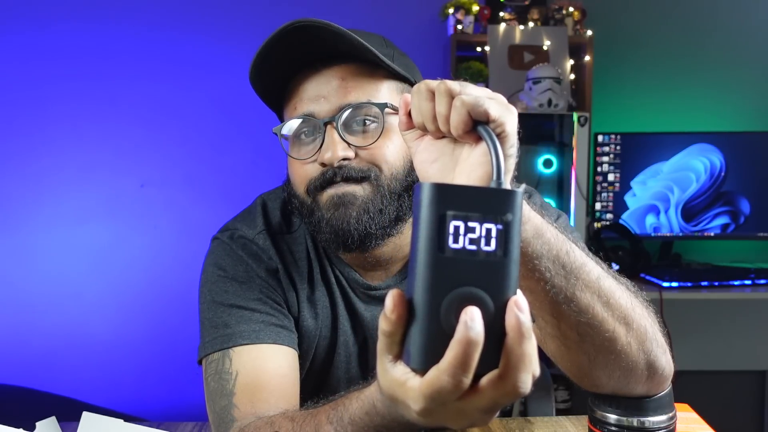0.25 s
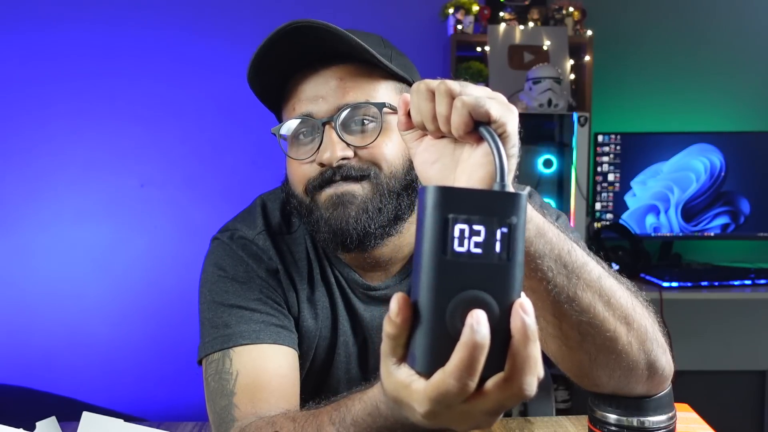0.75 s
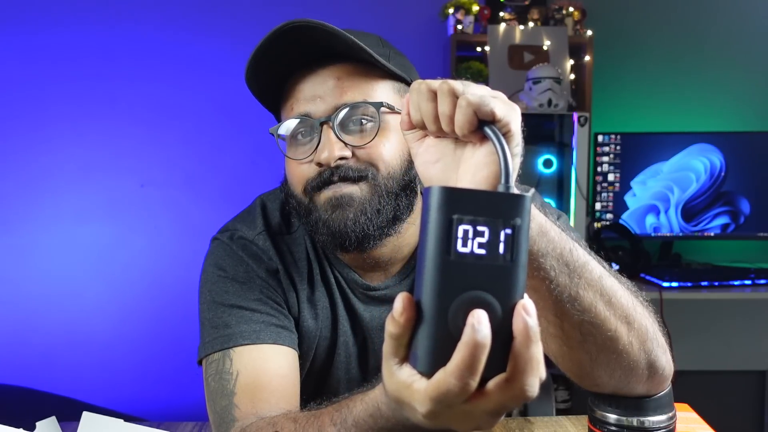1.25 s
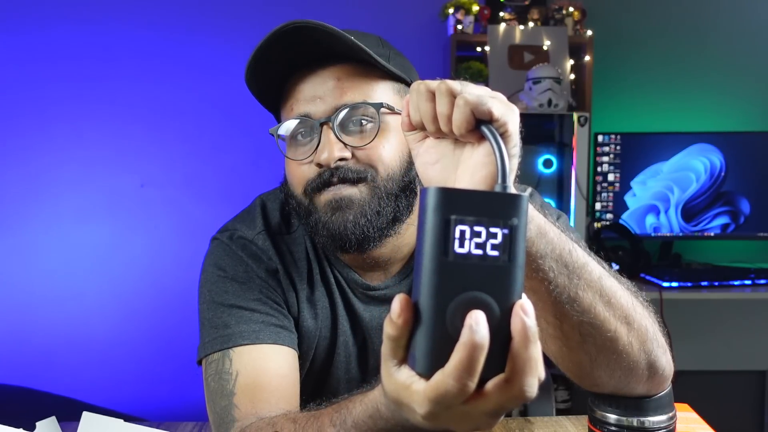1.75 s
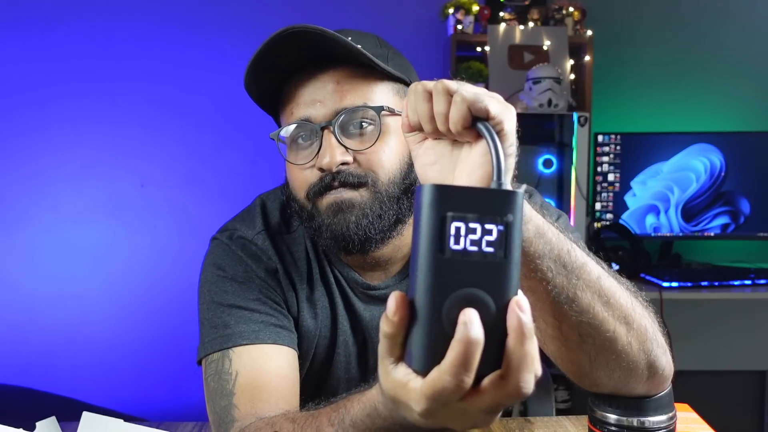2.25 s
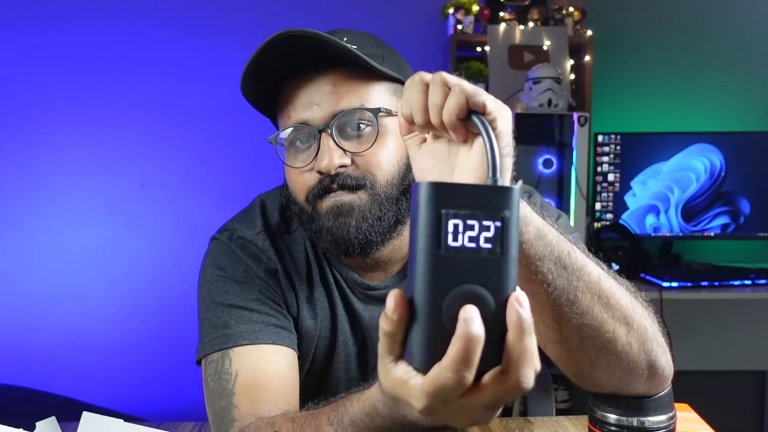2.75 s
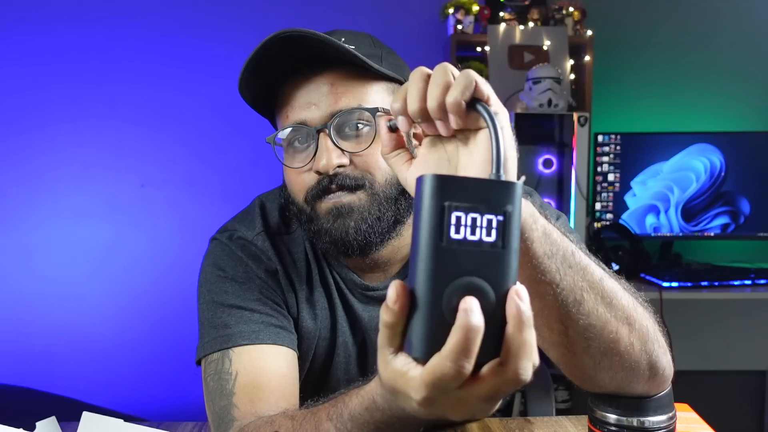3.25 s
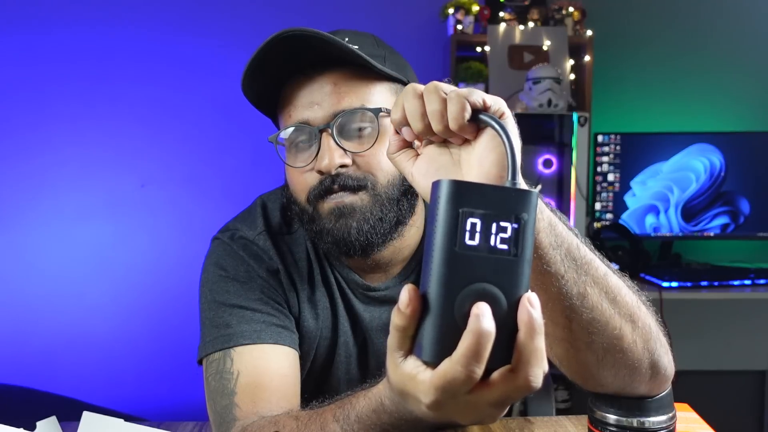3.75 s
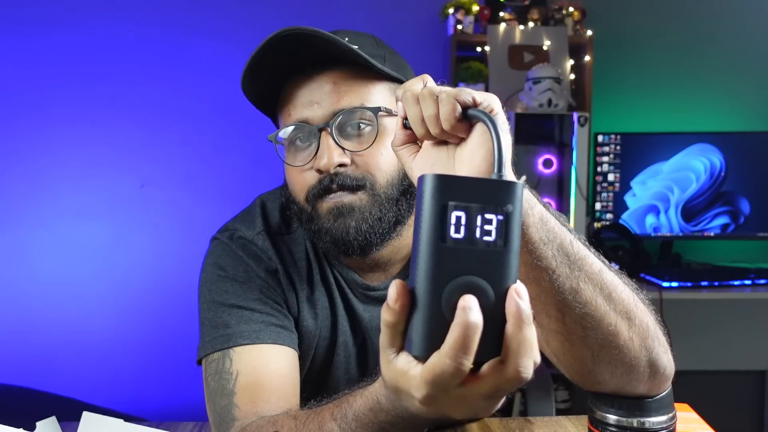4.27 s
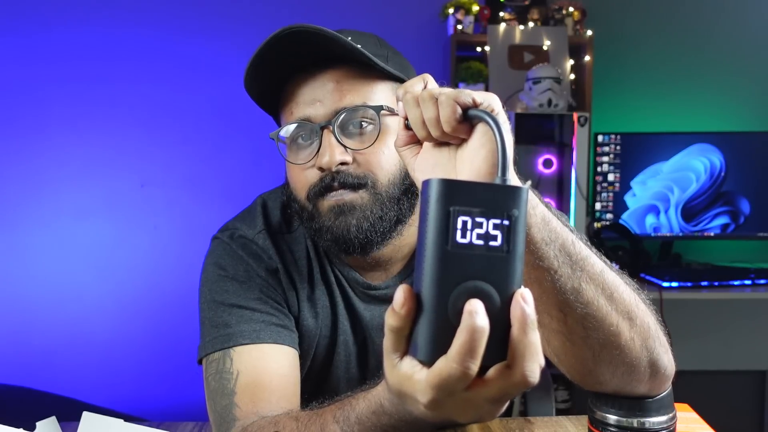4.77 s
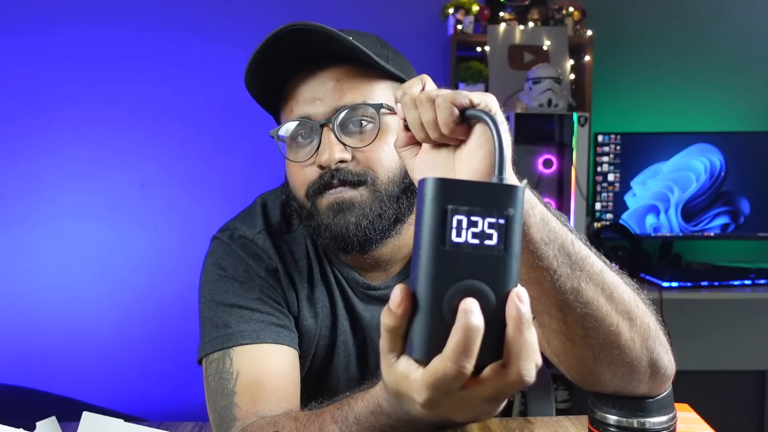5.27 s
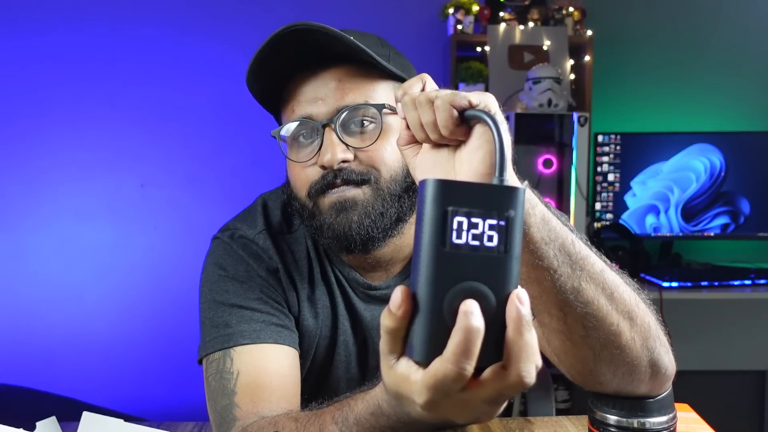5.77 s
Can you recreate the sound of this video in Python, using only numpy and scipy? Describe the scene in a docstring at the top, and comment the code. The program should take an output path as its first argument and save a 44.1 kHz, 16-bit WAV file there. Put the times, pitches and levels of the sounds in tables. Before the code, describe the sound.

A small hand-held air pump buzzes loudly and steadily with a whining gear tone, briefly racing and hissing midway, then labouring slightly lower.

```python
"""A hand-held electric piston pump runs in a small room, its hose end held shut by a hand.
Each crank turn knocks the case, rattles the drive and puffs air; the gears whine and sag under compression.
Knocks ring case resonances, ticks and air are shaped noise, and whine, hum and motor are sines locked to the crank.
The pump settles a little after a loud start. Near 3 s the grip opens and closes again:
air escapes and the motor races briefly, then labours against a tighter seal."""
import sys
import numpy as np
from scipy import signal
from scipy.fft import rfft, irfft, next_fast_len
from scipy.io import wavfile
from scipy.ndimage import map_coordinates

SR = 44100
rng = np.random.default_rng(int(sys.argv[2]) if len(sys.argv) > 2 else 0)


def transcribe(u):
    """Save the signal u as a 16-bit wav file named by the first command-line argument.

    u: samples, shape (n,) or (channels, n), limited to [-1, 1]; the rate is SR.
    q: integer samples, one column per channel.
    """
    v = np.clip(np.atleast_2d(u).T, -1, 1)
    q = np.round(v * 32767).astype(np.int16)
    wavfile.write(sys.argv[1], SR, q)


N = 265482  # length [samples]

GEAR_RATIO, TEETH = 7.4, 12  # motor turns per crank turn, teeth on the motor's pinion


def amp(db):
    """Decibels to gain."""
    return 10 ** (np.asarray(db) / 20)


def unit(x):
    """Scaled to rms 1."""
    return x / np.sqrt(np.mean(x ** 2) + 1e-20)


def curve(rows):
    """A (time, value) table as one value per sample."""
    times, values = np.transpose(rows)
    return np.interp(np.arange(N) / SR, times, values)


def wobble(rate):
    """A smooth random curve, rate knots a second."""
    knots = rng.standard_normal(int(N * rate / SR) + 4)
    return map_coordinates(knots, [np.arange(N) * rate / SR])


def filtered(x, response):
    """x times a complex response of frequency."""
    size = 2 * next_fast_len(N // 2 + SR // 4)
    spectrum = rfft(x, size) * response(np.fft.rfftfreq(size, 1 / SR))
    return irfft(spectrum, size)[:N]


def coloured(x, points):
    """x through a causal filter with the given (frequency [Hz], level [dB]) outline, at rms 1."""
    f, db = np.transpose(points)

    def response(hz):
        outline = amp(np.interp(np.log(hz + 1), np.log(f), db))
        # folding the cepstrum gives the outline its minimum phase
        cepstrum = irfft(np.log(outline))
        return np.exp(rfft(2 * cepstrum[:len(cepstrum) // 2], len(cepstrum)) - cepstrum[0])
    return unit(filtered(x, response))


def ringing(x, modes):
    """x through a set of resonances, at rms 1; neighbouring modes swing against each other."""
    def bank(f):
        total = 0
        for k, (centre, width, db) in enumerate(modes):
            damping = 1j * f * width
            total = total + (-1) ** k * amp(db) * damping / (centre ** 2 - f ** 2 + damping)
        return total
    # a small case radiates little below its modes
    radiation = [(250, -27.5), (550, -9.0), (780, -1.0), (1700, -2.5), (4000, -3.0)]
    return coloured(filtered(x, bank), radiation)


# crank speed: (time [s], speed [turns/s])
CRANK_SPEED = [(0.0, 36.344), (0.4, 36.498), (1.6, 36.763), (2.65, 36.689), (2.9, 37.774), (3.15, 38.132),
               (3.35, 37.936), (3.7, 36.013), (4.05, 35.579), (4.75, 35.793), (5.3, 35.642), (6.02, 35.332)]


def crank():
    """The crank's speed, and its running count of turns with a slight random unevenness."""
    speed = curve(CRANK_SPEED)
    return speed, np.cumsum(speed) / SR + 0.0019 * wobble(14)


# the hose gap: moment it is widest, time to open, time to close [s]
WIDEST_S, OPEN_S, CLOSE_S = 3.13, 0.49, 0.5


def grip():
    """How far the hose is open (0-1), and how far the tighter second grip has taken over (0-1)."""
    t = np.arange(N) / SR - WIDEST_S
    progress = np.clip(t / np.where(t < 0, OPEN_S, CLOSE_S), -1, 1)
    return np.cos(np.pi / 2 * progress) ** 2, (1 + progress) / 2


# one crank turn, relative: (share of the turn [0-1], rattle [dB], gear whine [dB], air [dB])
CRANK_TURN = [(0, 1.5, -8, 7.5), (.09, -2, -11, 3.5), (.2, -2.5, -1.5, 2), (.4, -4, -26, 0),
              (.5, 0, -15, 3.5), (.56, -5, -13.5, 12.5), (.65, -2, -0.5, 11), (.74, -3, 2.5, -2.5),
              (.8, -1.5, 4.5, 0.5), (.86, 3.5, 1, 7), (.93, -1.5, 10, 12.5)]


def stroke(turns):
    """Strain on the drive, load on the gears and puff of air, repeating with each crank turn."""
    share, *columns = np.transpose(CRANK_TURN)
    return [np.interp(turns % 1, share, column, period=1) for column in columns]


# relative force of the valve's knock, which the motor tone follows too: (time [s], level [dB])
KNOCK_FORCE = [(0, -21), (1.2, -22.5), (1.6, -24), (2.25, -21.5), (2.65, -23.5), (2.88, -28), (3.15, -22.5),
               (3.33, -26.5), (3.55, -21.5), (3.8, -22), (4.25, -20.5), (4.5, -23.5), (5.15, -24.5),
               (5.6, -20), (6.02, -22)]


def knock_level():
    """The blows get harder and softer over time."""
    return curve(KNOCK_FORCE)


# case and hose resonances in the first and second grip: (centre [Hz], width [Hz], relative level [dB])
FIRST_GRIP_MODES = [(579, 4.9, -8), (813.6, 23.5, -6), (877, 15.6, 3.5), (933, 42, -0.5), (994, 62, -4.5),
                    (1025.5, 14, -1), (1100, 26, -1.5), (1342, 17, -6.5), (1595, 51, -7)]
SECOND_GRIP_MODES = [(762, 69, -12), (834.5, 20.6, 1.5), (856, 25, -7.5), (902, 38.4, -0.5),
                     (1031.3, 15.3, 3.5), (1110, 9, -24), (1280, 25, -7.5), (1410, 47, -14),
                     (1605, 34, -2.5), (2256, 85, -6.5)]
# outline of the dull thud: (frequency [Hz], level [dB per Hz])
THUD_OUTLINE = [(25, -32), (37, -12), (73, -11.5), (110, -34), (150, -13.5), (290, -14), (380, -2.5),
                (500, -2.5), (640, 6), (820, 0.5), (1100, 8.5), (1600, -2), (3000, -43.5)]


def knock(turns, leak, tight, level_db, thud_db, scatter_db, ring_db, rub_db):
    """The valve knocks once a turn and the piston rubs: a dull thud, and a case ring that shifts with the grip."""
    at = np.flatnonzero(np.diff(np.floor(turns)) > 0)
    blows = np.zeros(N)
    blows[at] = amp(scatter_db * rng.standard_normal(len(at)))
    force = unit(blows) + amp(rub_db) * rng.standard_normal(N)
    first_ring = np.sqrt(1 - tight) * ringing(force, FIRST_GRIP_MODES)
    second_ring = np.sqrt(tight) * ringing(force, SECOND_GRIP_MODES)
    thud = amp(thud_db) * coloured(blows - blows.mean(), THUD_OUTLINE)
    # the ring is weaker while the hose leaks
    return amp(level_db) * (amp(ring_db - 4.4 * leak) * (first_ring + second_ring) + thud)


# outline of the drive's ticking: (frequency [Hz], level [dB per Hz])
RATTLE_OUTLINE = [(100, -37), (300, -28), (500, -23.5), (680, -11), (820, 1), (1100, 1.5), (1300, 0.5),
                  (1700, -1.5), (2050, -0.5), (2400, -1.5), (2780, -5.5), (3300, -1), (3700, -7),
                  (4600, -6), (6000, -13), (9000, -38.5)]


def rattle(turns, level_db, repeat_db, spiky_db):
    """Teeth and bearings tick; part of the ticking comes back alike on every turn."""
    count = SR // 36  # points in the repeating pattern, about one turn long
    wear = rng.standard_normal(count)
    alike = map_coordinates(wear, [turns % 1 * count], mode="grid-wrap")
    loose = unit(rng.standard_normal(N) * amp(spiky_db * wobble(1500)))
    return coloured(amp(level_db) * (amp(repeat_db) * alike + loose), RATTLE_OUTLINE)


# gear whine harmonics: (multiple of the tooth rate, level [dB])
MESH_HARMONICS = [(1, 0), (2, -24), (3, -19)]


def whine(turns, load_db, leak, sag, sag_at, ripple, flutter):
    """The tooth rate rises on the free stroke and sags under compression; backlash blurs it, most off load."""
    angle = 2 * np.pi * (turns - sag_at)
    phase = 2 * np.pi * TEETH * GEAR_RATIO * turns
    phase = phase + sag * np.cos(angle) + ripple * np.cos(2 * angle)
    phase = phase + flutter * wobble(35) + (0.33 + 1.75 * leak) * wobble(350)
    tone = sum(amp(db) * np.sin(multiple * phase) for multiple, db in MESH_HARMONICS)
    even_db = -0.5  # slack gears chatter more evenly round the turn
    swell_db = load_db + 0.71 * leak * (even_db - load_db)
    return unit(tone * amp(swell_db + 2.4 * wobble(250)))


# outline of the valve air: (frequency [Hz], level [dB per Hz])
AIR_OUTLINE = [(1500, -31), (4000, -10), (5200, 0), (5750, -9.5), (6400, 1), (6850, -3), (7500, 1.5),
               (8300, 1), (8850, -2.5), (9400, -3.5), (10050, -14.5), (12200, -14), (12900, -10),
               (13500, -13), (15600, -20)]


def air(puff_db, spiky_db):
    """Air spits through the valves on every stroke: noise swelling with the puffs."""
    spit = rng.standard_normal(N) * amp(0.55 * puff_db + spiky_db * wobble(1200))
    return coloured(spit, AIR_OUTLINE)


# spurts: level [dB], spread around the widest gap [s], centre and spread within the turn [turns]
JET_DB, JET_S, JET_AT, JET_SHARE = -20, 0.083, 0.72, 0.17


def jet(turns):
    """While the gap is widest, each compression spurts a hiss from the hose."""
    from_peak = (turns - JET_AT + .5) % 1 - .5
    from_widest = np.arange(N) / SR - WIDEST_S
    spurts = np.exp(-(from_peak / JET_SHARE) ** 2 - (from_widest / JET_S) ** 2)
    outline = [(3000, -29), (6500, -6), (7600, 2), (8700, 4), (9800, -7), (11500, -18), (15000, -15)]
    hiss = coloured(rng.standard_normal(N), outline)
    return amp(JET_DB) * spurts * hiss


# hollow of the hand: resonance shut and wide open [Hz], harmonic level at resonance when wide open [dB]
SHUT_HZ, WIDE_HZ, HOLLOW_DB = 105, 188, -51


def cupped_hand(turns, speed, leak, sharpness):
    """Air pulses blow through the hollow hand; its resonance rises as it opens, favouring near harmonics."""
    hollow_hz = SHUT_HZ + (WIDE_HZ - SHUT_HZ) * leak
    pulses = 0
    for k in range(2, 9):
        gain = 1 / (1 + (sharpness * np.log(k * speed / hollow_hz)) ** 2)
        pulses = pulses + gain * np.sin(2 * np.pi * k * turns + k * k)
    return amp(HOLLOW_DB) * np.sqrt(leak) * pulses


# shake of the case: (multiple of the crank speed, first grip [relative dB], second grip [relative dB])
CASE_SHAKE = [(2, -16, -7), (4, 2, 1.5), (5, -17, 0), (6, -4, -2.5), (7, -30, -8.5)]


def hum(turns, tight, first_db, second_db):
    """The unbalanced drive shakes the case at low multiples of the crank speed; the grip sets their balance."""
    shake = 0
    for k, first, second in CASE_SHAKE:
        level_db = (1 - tight) * (first_db + first) + tight * (second_db + second)
        shake = shake + amp(level_db) * np.sin(2 * np.pi * round(k) * turns + k * k)
    return shake


def motor(turns, level_db):
    """The armature sings a faint thin tone at four times its own speed."""
    phase = 2 * np.pi * 4 * GEAR_RATIO * turns
    return amp(level_db + 4.4 * wobble(5.5)) * np.sin(phase)


def room(x, t60, wet_db):
    """Desk and walls add a short diffuse tail."""
    t = np.arange(SR // 3) / SR
    tail = rng.standard_normal(len(t)) * amp(-60 * t / t60) * (t > .003)
    return x + amp(wet_db) * signal.fftconvolve(x, tail / np.linalg.norm(tail))[:N]


# outline of the room rumble: (frequency [Hz], level [dB per Hz])
RUMBLE_OUTLINE = [(20, -12), (60, 4), (150, -8), (400, -19), (2000, -27)]


def room_rumble(level_db):
    """A steady low noise lies under the pump."""
    return amp(level_db) * coloured(rng.standard_normal(N), RUMBLE_OUTLINE)


# the louder start: basic excess level [dB], time constant [s]; each layer takes its own share
SETTLE_DB, SETTLE_S = 4, 0.98
# base levels [dB] of the drive's rattle, the gear whine and the valve air
RATTLE_DB, WHINE_DB, AIR_DB = -21.5, -24.5, -27
# hum reference: level at the start [dB], its fade [dB/s], level under the tighter grip [dB]
HUM_DB, HUM_FADE_DB_PER_S, HUM_TIGHT_DB = -45.5, 1.5, -58.5


def scene():
    """One crank drives every sound of the pump; the grip sets its load; rumble lies beneath."""
    t = np.arange(N) / SR
    speed, turns = crank()
    leak, tight = grip()
    slack = np.sqrt(leak)  # the pressure drops as soon as the gap starts to open
    early_db = SETTLE_DB * np.exp(-t / SETTLE_S)
    strain_db, load_db, puff_db = stroke(turns)
    knock_db = knock_level()

    lead = 0.07 - 0.023 * tight  # [turns]; the valve opens later against the tighter seal
    thud_db = -17.5 + 1.6 * early_db + 0.93 * tight
    valve = knock(turns + lead, leak, tight, knock_db + 3, thud_db, scatter_db=1, ring_db=-4.5, rub_db=-12.5)

    drive = rattle(turns, strain_db * (1 - 0.55 * leak), repeat_db=-3.5, spiky_db=2)
    drive = amp(RATTLE_DB + 1.22 * early_db + 0.49 * leak) * drive

    gears = whine(turns, load_db, slack, sag=2.38, sag_at=0.729, ripple=0.81, flutter=0.43)
    gears = amp(WHINE_DB + 1.2 * early_db - 2.8 * slack) * gears

    breeze = amp(AIR_DB + early_db + 1.6 * leak) * air(puff_db, spiky_db=1.5) + jet(turns)

    shake = amp(-14 * slack) * hum(turns, tight, HUM_DB - HUM_FADE_DB_PER_S * t, HUM_TIGHT_DB)
    shake = shake + cupped_hand(turns, speed, leak, sharpness=3.8)

    hiss_and_whine = room(drive + gears + breeze, t60=0.16, wet_db=-12.0)
    thump = room(valve + motor(turns, knock_db - 18.5), t60=0.13, wet_db=-11.5)
    return (hiss_and_whine + thump + shake + room_rumble(-66))[None]


def record(dry):
    """Nothing is kept from 15.7 kHz up."""
    return filtered(dry[0], lambda hz: hz < 15700)[None]


dry = scene()
out = record(dry)
transcribe(out)
```